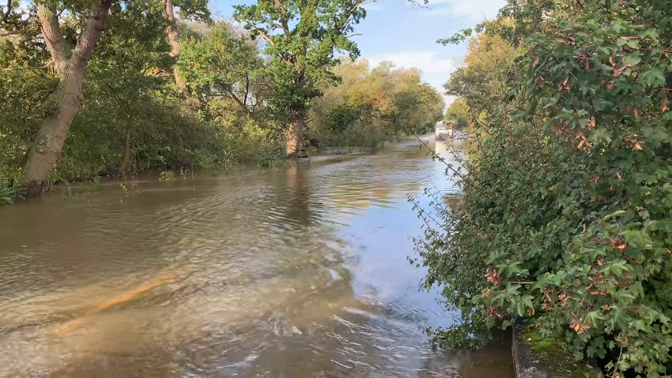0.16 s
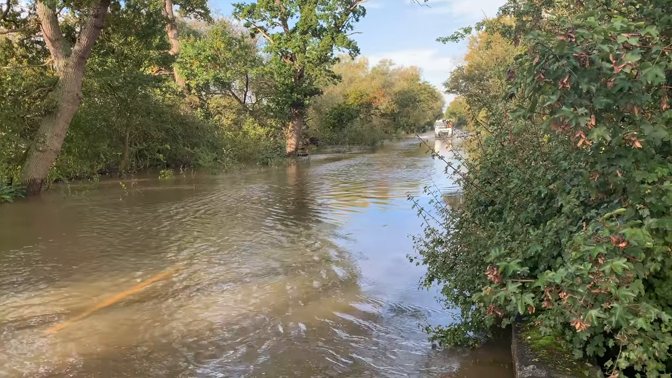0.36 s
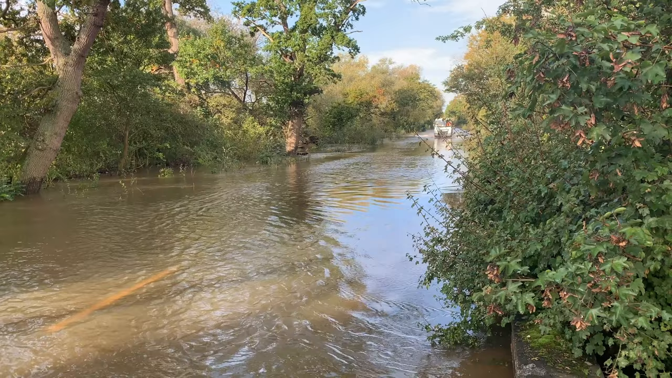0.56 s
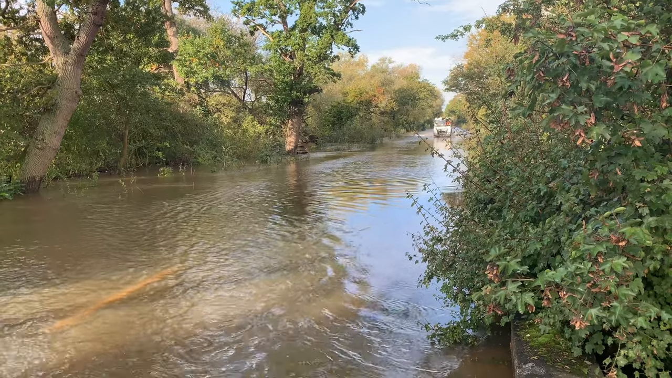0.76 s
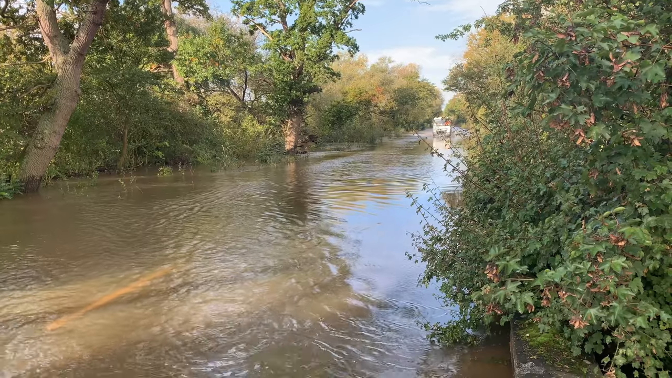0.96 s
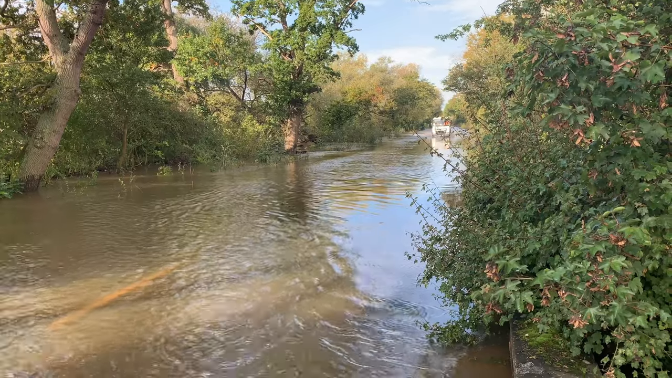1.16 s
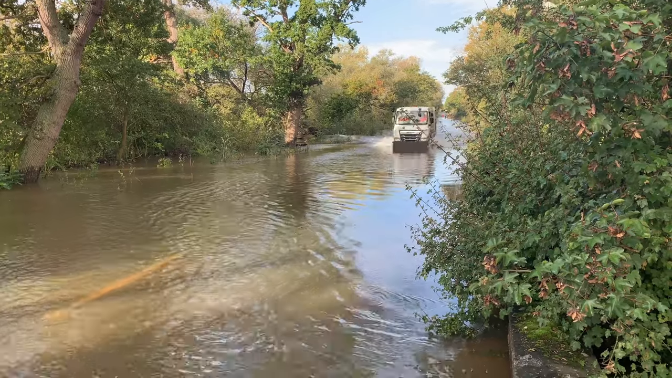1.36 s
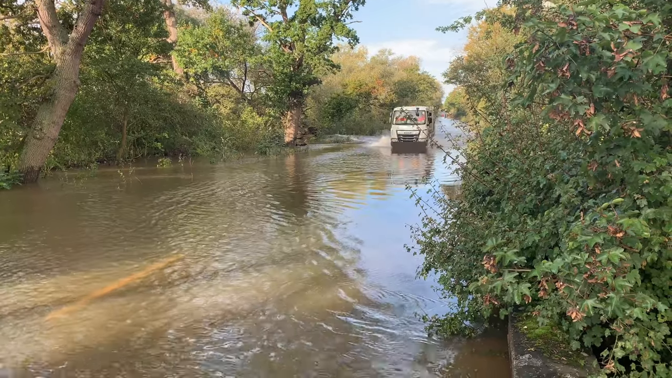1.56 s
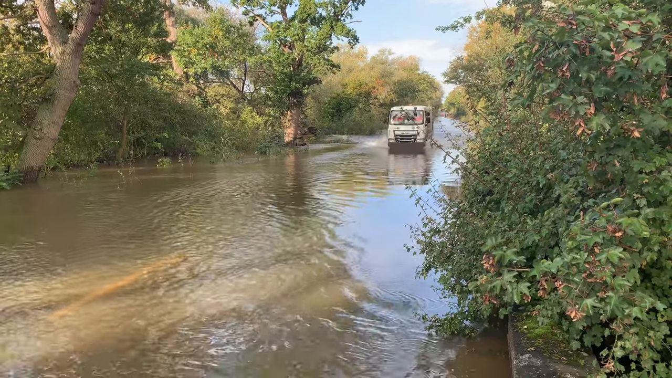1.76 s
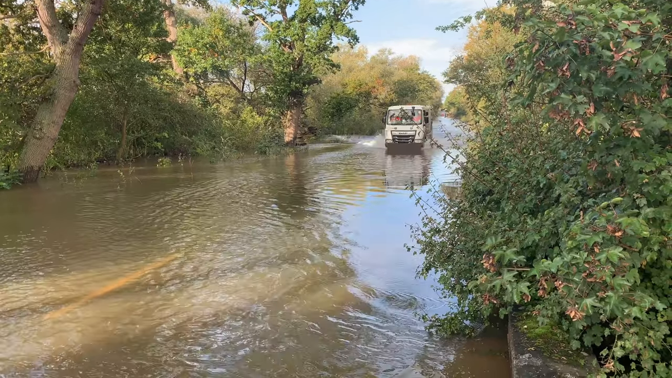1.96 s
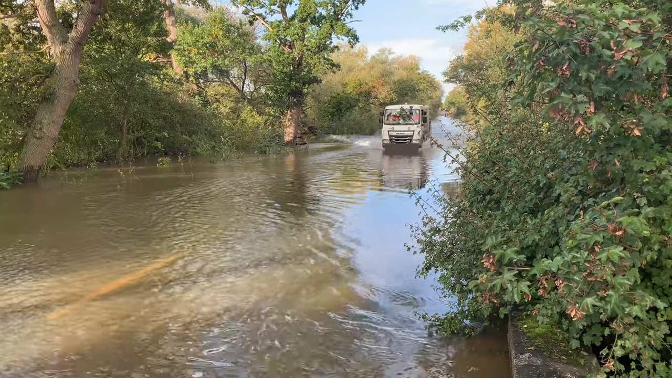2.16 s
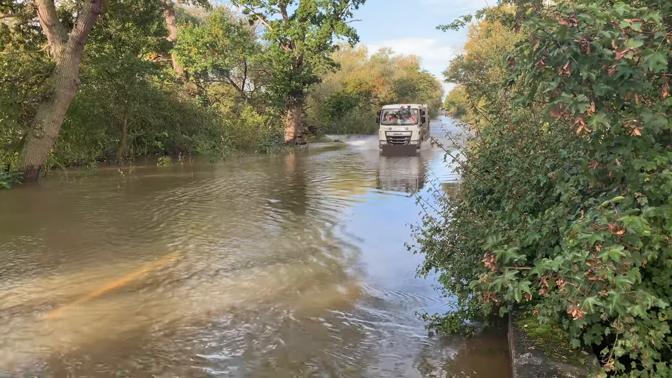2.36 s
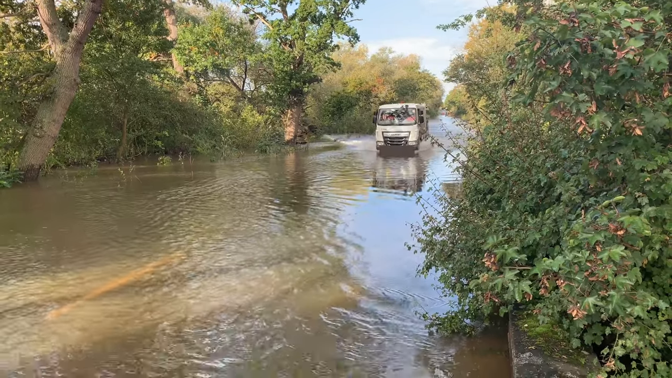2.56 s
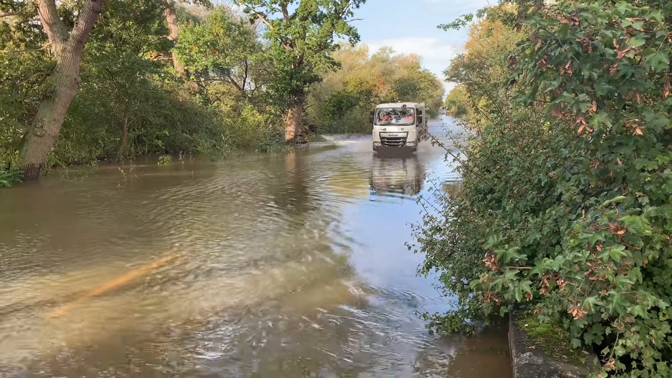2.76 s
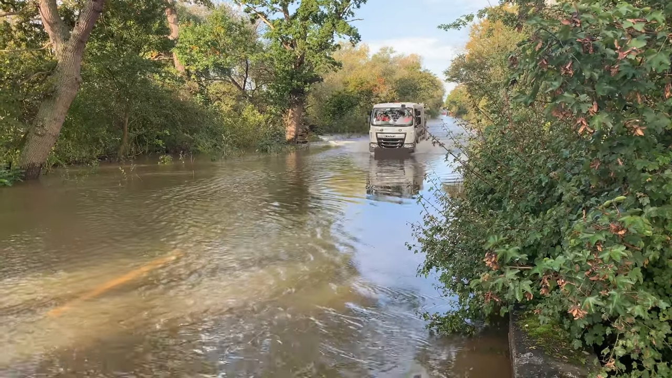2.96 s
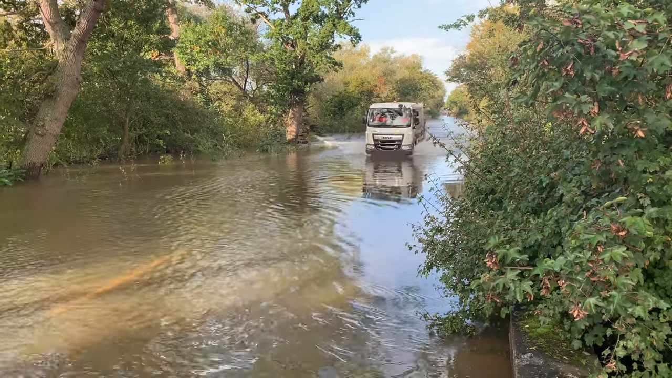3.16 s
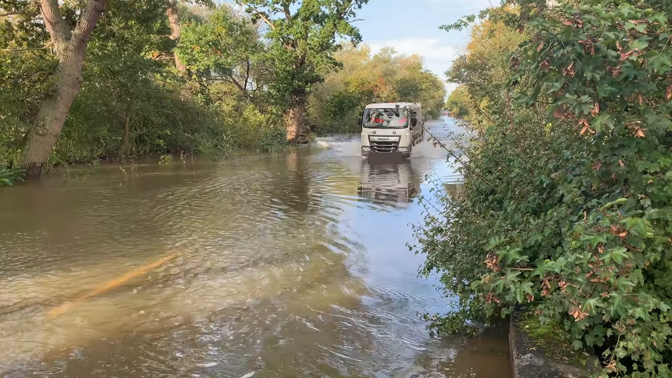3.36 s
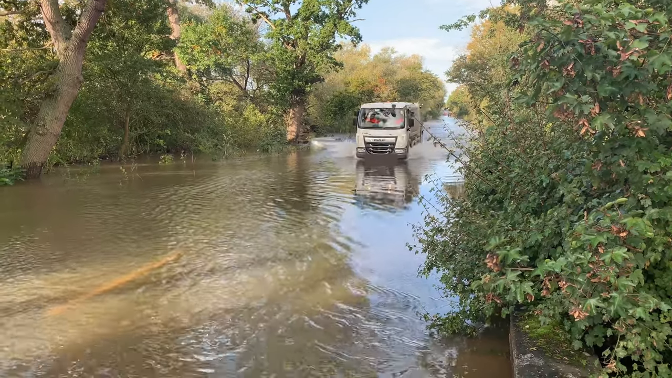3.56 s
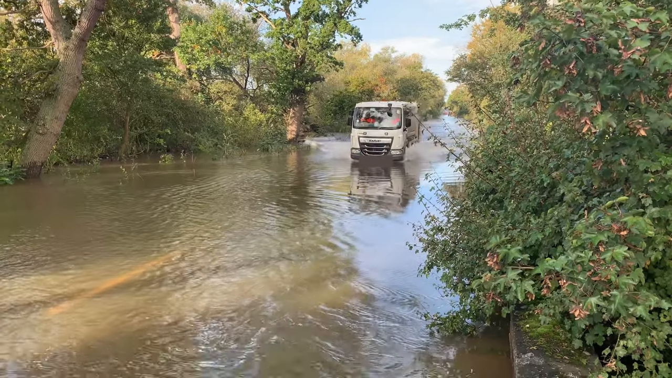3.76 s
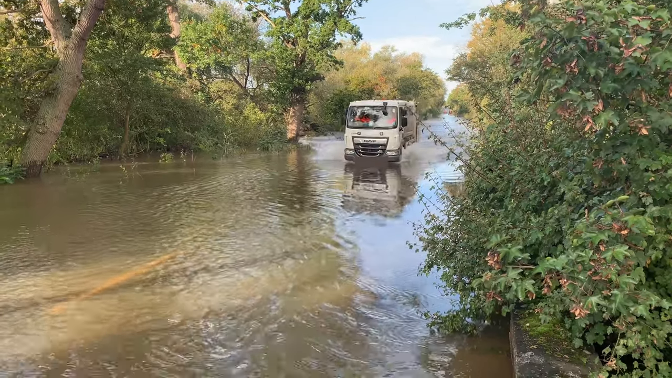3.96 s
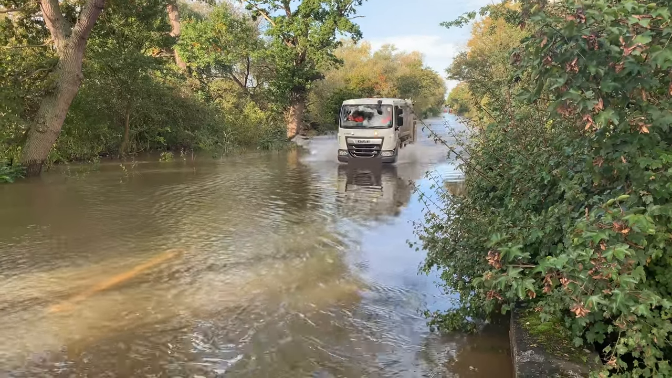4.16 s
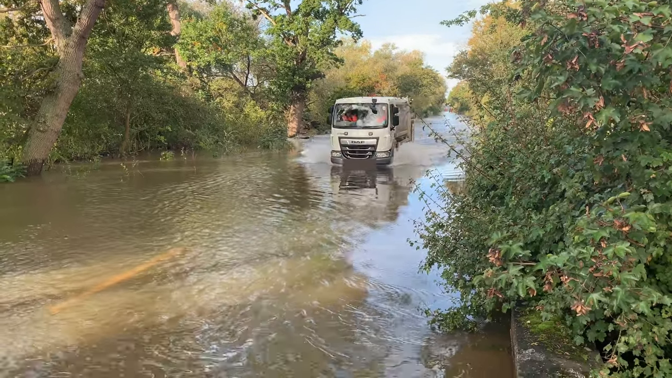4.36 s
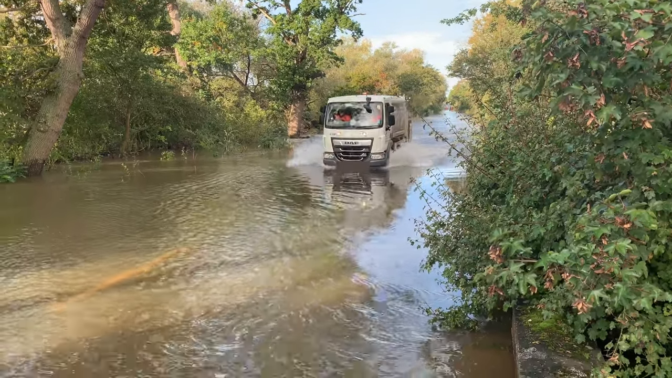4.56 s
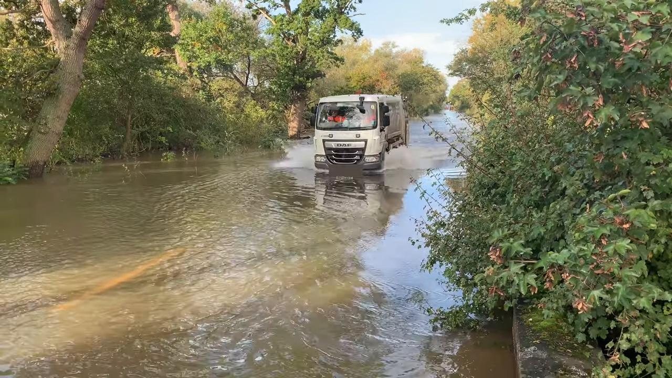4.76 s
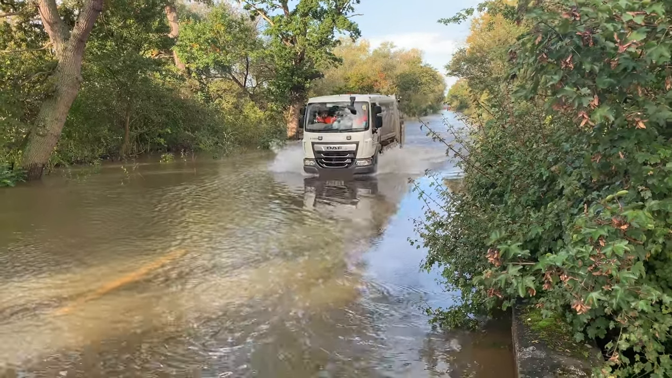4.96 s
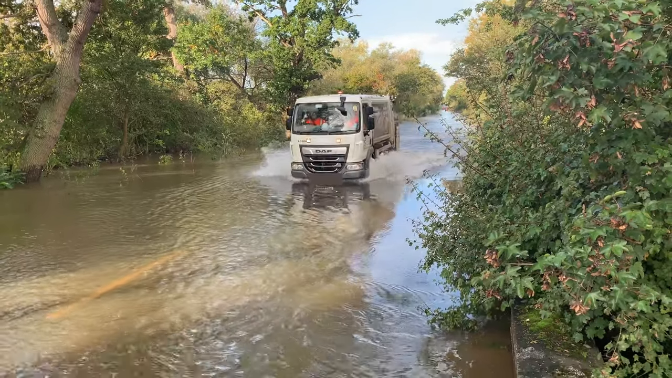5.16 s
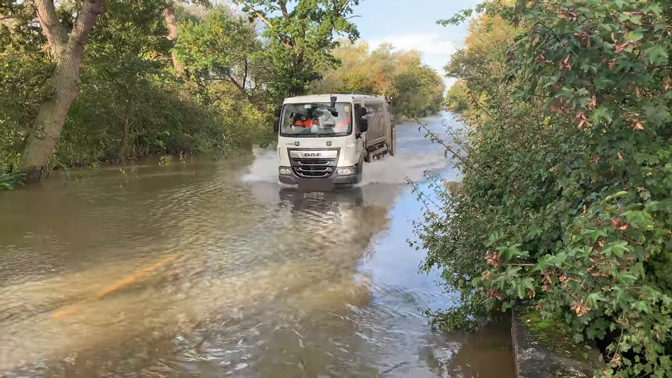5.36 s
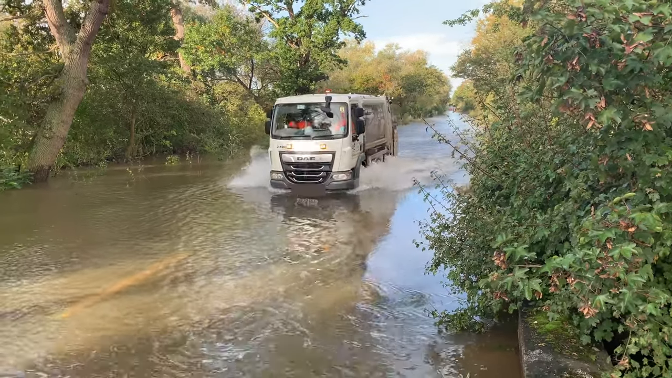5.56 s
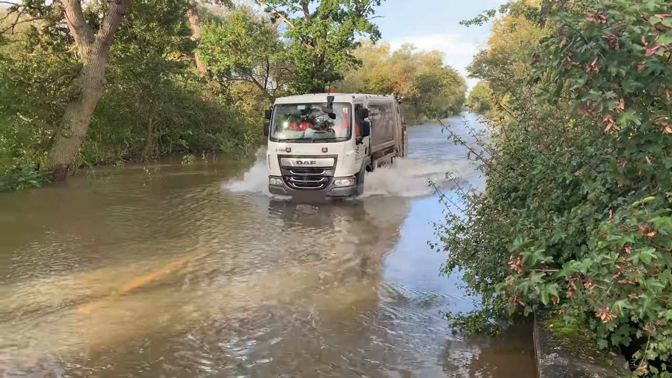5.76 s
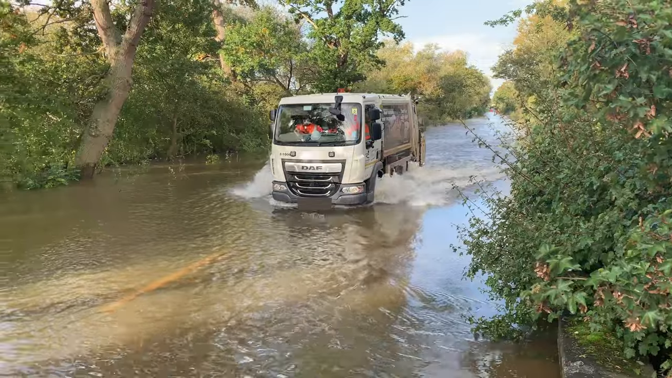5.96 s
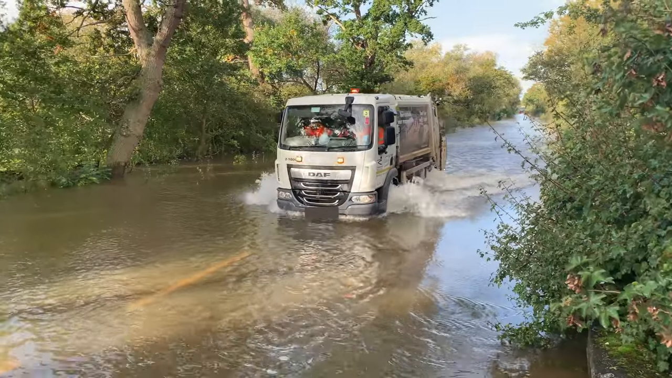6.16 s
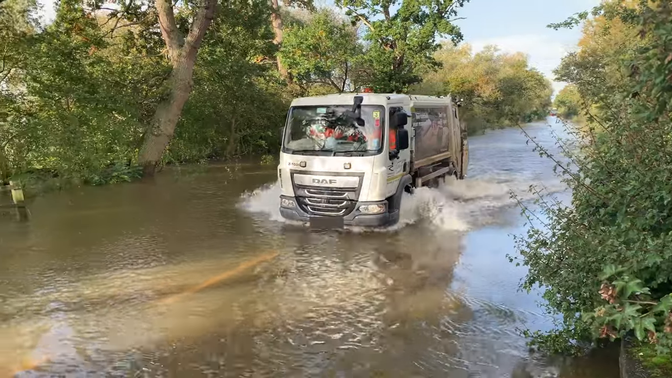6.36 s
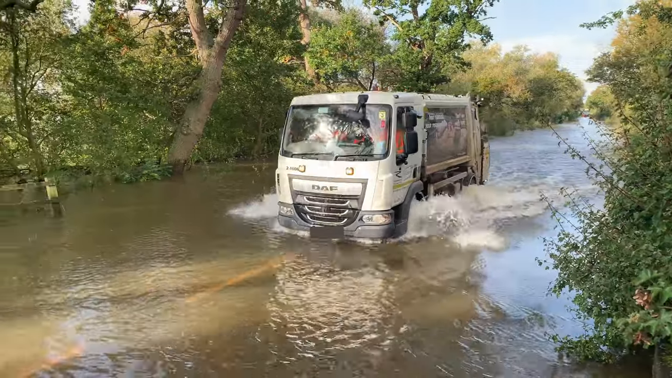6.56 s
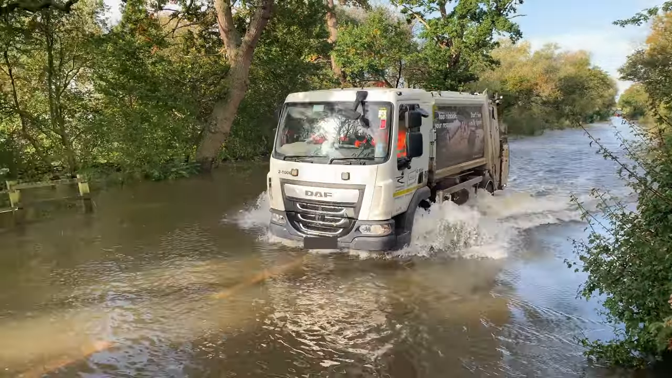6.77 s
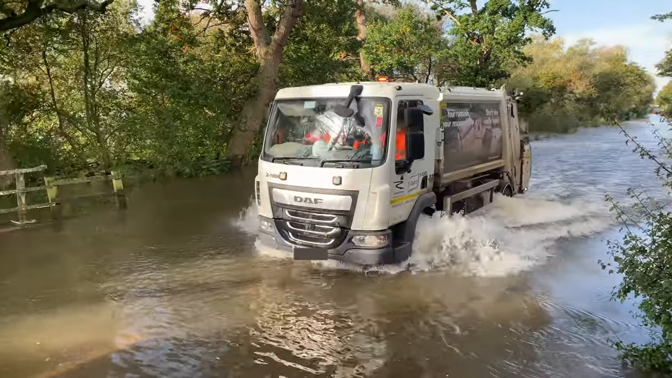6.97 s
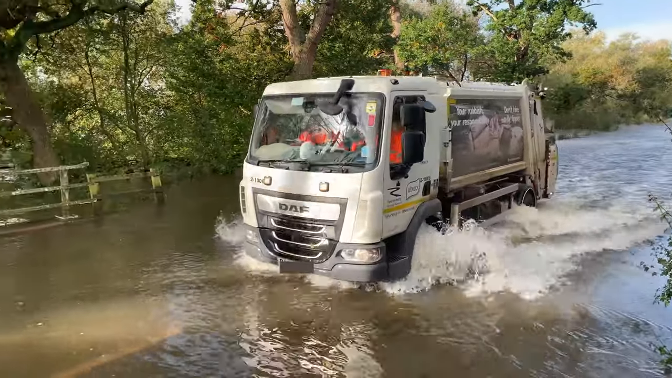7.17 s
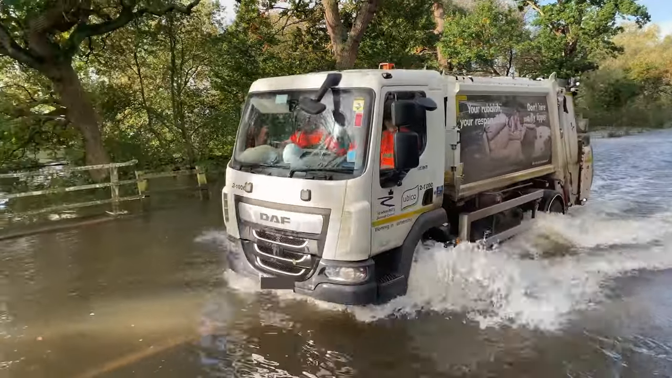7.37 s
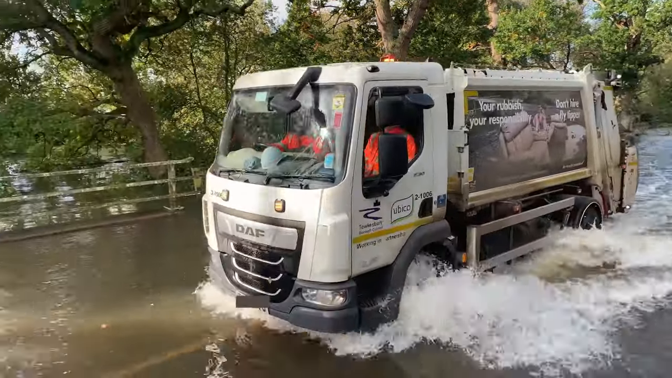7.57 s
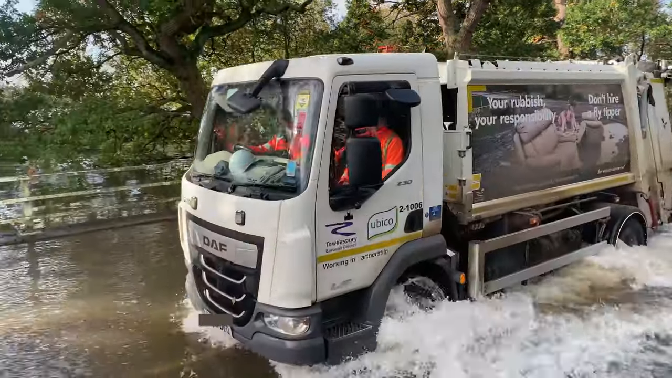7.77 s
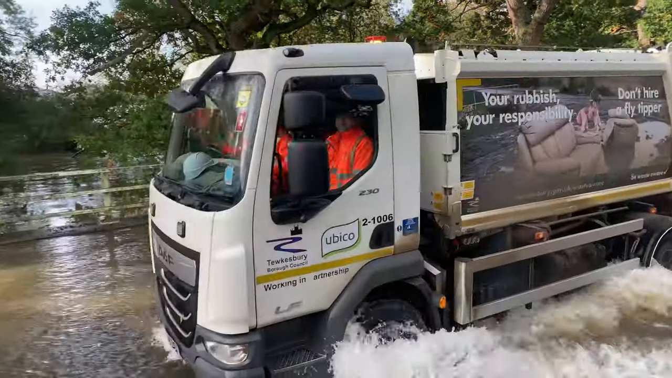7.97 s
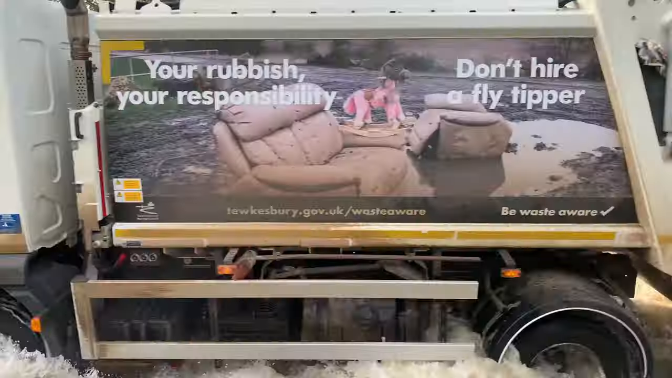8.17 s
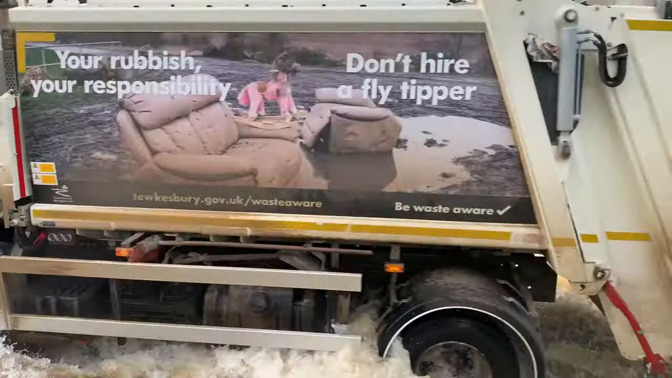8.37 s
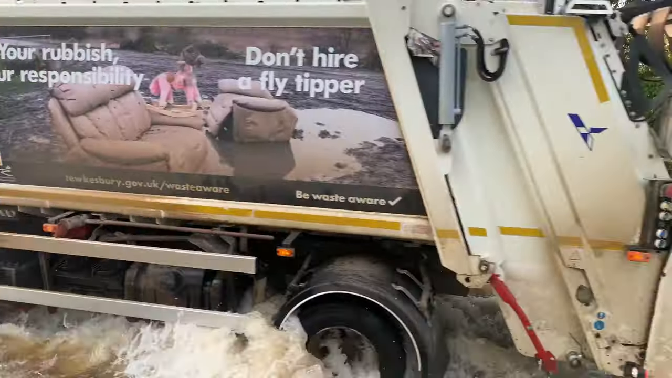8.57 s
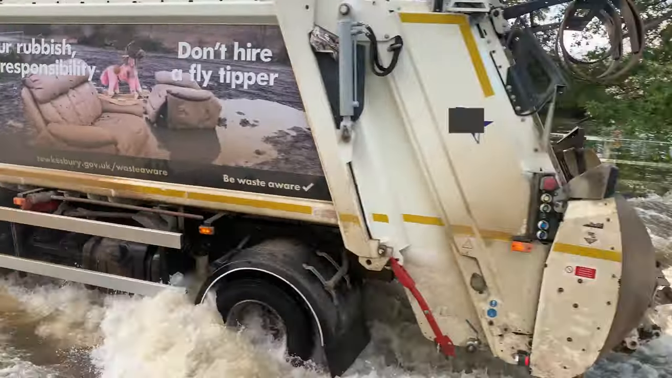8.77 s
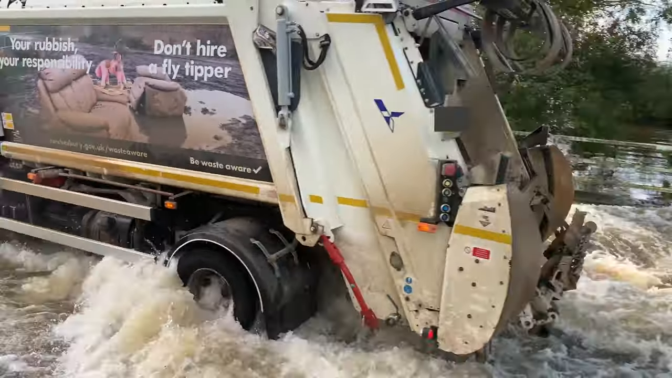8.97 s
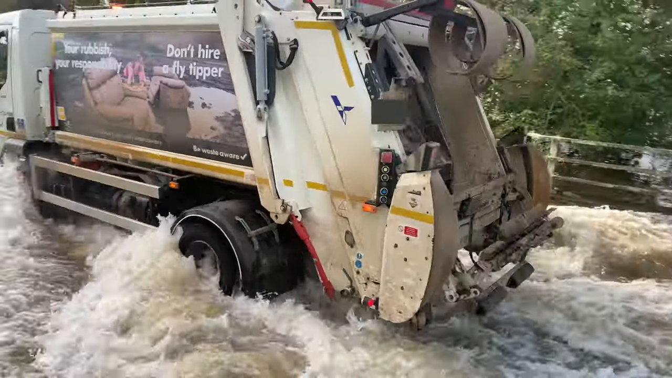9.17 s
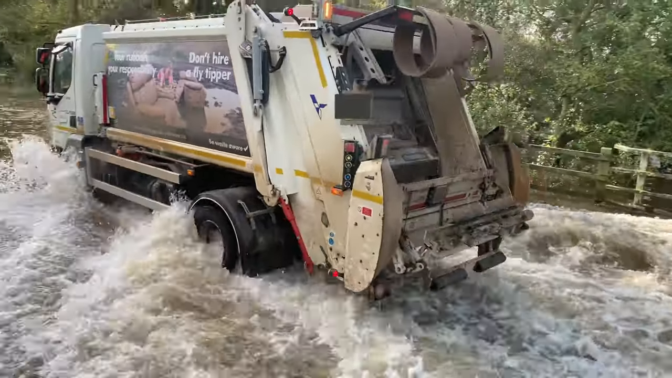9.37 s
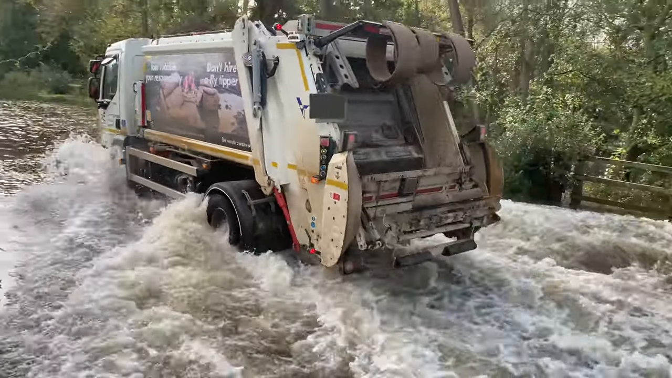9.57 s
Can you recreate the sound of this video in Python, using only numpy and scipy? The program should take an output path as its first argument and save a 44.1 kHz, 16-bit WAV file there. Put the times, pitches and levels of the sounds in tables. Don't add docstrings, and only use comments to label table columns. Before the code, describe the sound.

Open air beside a flooded tree-lined lane, heard in stereo from a few metres off the route. From 0 to 1.3 s a heavy diesel lorry is far away: faint low drone, soft rumble and water hiss, with small dull wind thumps at about 0.25, 0.35 and 0.9 s. Near 1.4 s the sound jumps to a closer moment. The steady engine drone, wavering with reflections, and a thin gear whine advance with growing spray; a weak wind puff comes around 2.1 s. From 4 to 6 s the water thickens and engine pitch sags slightly; the whine drops out around 6 to 7 s. Between 7.4 and 9 s the lorry passes close: bright splash bursts, roaring churn, deep hull booms, engine pitch rising slightly. The deep wake opens after 8.2 s, then the wash begins easing until the cut near 9.6 s.

```python
import sys
import numpy as np
from scipy import signal
from scipy.io import wavfile
from scipy.ndimage import uniform_filter1d

SR = 44100
rng = np.random.default_rng(int(sys.argv[2]) if len(sys.argv) > 2 else 0)


def convert_level_to_amplitude(level_db):
    exponent = np.asarray(level_db, float) / 20
    return 10 ** exponent


def generate_wav(sig):
    pcm = np.round(np.clip(np.atleast_2d(sig).T, -1, 1) * 32767).astype(np.int16)
    wavfile.write(sys.argv[1], SR, pcm)


N = 424683


def evened(x):
    return x / np.sqrt(np.mean(abs(x) ** 2) + 1e-20)


def read(points, hz, order=1):
    table = np.transpose(points)
    return np.interp(np.log(hz + 1), np.log(table[0] + 1), table[order])


def over_time(points, t):
    s, value = np.transpose(points)
    return np.interp(t, s, value)


def bumps(events, t):
    s, length, *columns = np.transpose(events)
    bells = np.exp(-(2 * (t - s[:, None]) / length[:, None]) ** 2)
    return np.array(columns) @ bells


def wander(t, slow_hz, fast_hz):
    rates_hz = np.geomspace(slow_hz, fast_hz, num=24)
    return evened(sum(np.sin(2 * np.pi * (f * t + rng.random())) / np.sqrt(f) for f in rates_hz))


def field(frames, bins, wide, long):
    hills = rng.standard_normal((bins, frames))
    hills = uniform_filter1d(hills, size=max(int(wide), 1), axis=0)
    return evened(uniform_filter1d(hills, size=max(int(long), 1), axis=1))


def metres(t, abreast_s, half_m):
    cut_s, skipped_s = 1.363, 9.9
    lorry_m_per_s, lane_m = 5, 4
    along_m = lorry_m_per_s * abs(t - skipped_s * (t < cut_s) - abreast_s)
    return np.hypot(lane_m, np.maximum(along_m - half_m, 0))


def heard_db(t, abreast_s, near_db, share, half_m):
    return near_db - share * 20 * np.log10(metres(t, abreast_s, half_m) / 5)


def side_on(t):
    return np.interp(t, (5, 7, 8.4), [0, 1 / 3, 1])


# middle_s, level_db, pitch_hz, length_s
THUMPS = [
    (0.242, -31, 49.7, 0.037),
    (0.356, -28, 50, 0.089),
    (0.934, -34, 60, 0.038),
    (2.102, -35, 51.3, 0.34),
    (8.151, -29, 33.6, 0.21),
]


def wind():
    t = np.arange(N) / SR
    out = 0
    for s, level_db, pitch_hz, length_s in THUMPS:
        swell = np.exp(-((t - s) / (.5 * length_s)) ** 2)
        out = out + convert_level_to_amplitude(level_db) * swell * np.cos(2 * np.pi * pitch_hz * (t - s))
    return np.array([out, -.12 * out])


# pitch_hz, width_hz, level_db
LANE_ECHOES = [(790, 43, 3), (1403, 400, -3), (1980, 63, -2), (2220, 270, 2.5), (2530, 180, 1.5),
               (3160, 180, -1.5), (4000, 140, 1), (4000, 150, -2), (4620, 240, 1.5), (5650, 1200, -1.5),
               (6480, 650, 3.5)]
# pitch_hz, level_db
PORT_SUM = [(6500, 3), (7250, 4.5), (8100, 5), (10300, 6), (11000, 0), (11600, -46), (12200, 9),
            (13000, 7.5), (15000, 9.5)]
# pitch_hz, level_db
PORT_DIFF = [(40, -21), (120, -9.5), (300, -8.5), (800, -1.5), (2100, 0), (2900, 7), (3900, 0.5), (7300, 6),
             (8200, 6), (8500, -18), (9500, -14), (9900, 3), (12500, 12.5), (13300, -8), (14600, -10),
             (15300, 3)]
# pitch_hz, share_in_step (-1 to 1), share_quarter_cycle_ahead (-1 to 1)
PORT_LINK = [(60, -0.77, -.2), (250, -0.77, -0.38), (450, -0.16, 0.68), (800, -0.055, .85),
             (1350, 0.55, .4), (1900, 0.11, -.55), (2600, -.3, .55), (4000, -.2, .2), (5300, -.5, .2),
             (6200, -.25, -.3), (7200, .1, .2), (8000, 0, .6), (10400, 0, -.55), (12400, 0, .3)]
# pitch_hz, level_db
NOTCH = [(6300, 0), (6900, -5), (7250, -14), (7650, -4), (8000, 0)]
# middle_s, length_s, added_depth (0-1)
SHADINGS = [
    (4.15, .7, .35),
    (9, .2, .65),
    (9.22, .22, .65),
]
# pitch_hz, level_db
MIC_TOP = [(14300, 0), (14900, -4), (15250, -13), (15600, -24), (16200, -45)]


def noise(spectrum, shift, control, patchy_db, ripple_db, flicker_db, size, count):
    hop = size // 4
    frames, hz = N // hop + 5, np.fft.rfftfreq(size, 1 / SR)[:count]
    t = np.arange(frames) * hop / SR
    far = 1 - side_on(t)

    patches = field(frames, count, wide=600 / hz[1], long=.05 * SR / hop)
    level_db = (read(spectrum, hz) + read(MIC_TOP, hz))[:, None] + patchy_db * patches
    level_db = level_db + flicker_db * wander(t, 3.4, 14) + np.outer(read(shift, hz), control(t))

    ripple_depth_db = ripple_db * (.3 + .7 * far)
    mid_ripple, side_ripple = [ripple_depth_db * field(frames, count, 170 / hz[1], 3 * SR / hop) for _ in "ms"]
    lane_db = sum(db * np.exp(-2 * ((hz - centre_hz) / width) ** 2) for centre_hz, width, db in LANE_ECHOES)
    notch_depth = .4 + bumps(SHADINGS, t)[0]
    mid_db = read(PORT_SUM, hz)[:, None] + np.outer(read(NOTCH, hz), notch_depth)
    mid_db = mid_db + mid_ripple + np.outer(lane_db, far)
    side_db = read(PORT_DIFF, hz)[:, None] + side_ripple

    link = np.outer(read(PORT_LINK, hz) + 1j * read(PORT_LINK, hz, order=2), .75 + .45 * far)
    link = link / np.maximum(abs(link) / .99, 1)
    a, b, c, d = rng.standard_normal((4, count, frames))
    mid = a + 1j * b
    side = link * mid + np.sqrt(1 - abs(link) ** 2) * (c + 1j * d)

    scale = np.sqrt(np.sum(convert_level_to_amplitude(2 * read(spectrum, hz))))
    z = np.array([mid * convert_level_to_amplitude(mid_db), side * convert_level_to_amplitude(side_db)]) * convert_level_to_amplitude(level_db) / scale
    z = np.pad(z, ((0, 0), (0, size // 2 + 1 - count), (0, 0)))
    return signal.istft(z, nperseg=size, noverlap=size - hop)[1][:, :N]


# middle_s, length_s, spray_db, rumble_db, hull_boom_db
SURGES = [(2.5, .4, .5, 0, 1.5), (4, 0.83, .3, 1, -1.5), (4.9, 1.5, 0.7, 0, -1.7),
          (6.3, 0.79, -0.4, 1.5, -1.2), (6.65, .3, -0.9, .1, 0.5), (7.4, 0.61, -0.7, -0.2, 3),
          (7.42, 0.058, 2, 0, -1), (7.78, 0.12, 2, 2.5, -1.5), (8.08, 0.11, 1, 0.5, -3.5),
          (8.22, 0.16, 0.5, 0.3, 6.5), (8.55, 0.28, 0.3, -1.2, 7.5), (8.95, 0.23, 0, -0.7, .1),
          (9.1, 0.18, 0.2, 0.5, 2.5), (9.55, 0.35, -0.7, -1.5, -2)]


def surges(t):
    return bumps(SURGES, t)


# pitch_hz, level_db (per Hz)
SPRAY = [(700, -4), (1400, -1), (2200, 1.5), (2700, -1.5), (3200, -3), (5000, -3.5), (6500, -6), (8000, -5),
         (8900, -2.5), (10300, -7), (12000, -13), (14300, -13)]
# pitch_hz, level_db
AIR_LOSS = [(6500, 0), (8500, .5), (10500, 1.1), (12000, 2.2), (15000, 2.5)]


def bow_spray():
    t = np.arange(N) / SR
    mist = lambda s: -2.1 * (metres(s, abreast_s=8, half_m=0) / 33) ** 1.7
    spray = noise(SPRAY, AIR_LOSS, mist, patchy_db=1.15, ripple_db=1.1, flicker_db=.45, size=512, count=190)
    level_db = heard_db(t, abreast_s=8, near_db=-29, share=.98, half_m=.5) + surges(t)[0] + .55
    return convert_level_to_amplitude(level_db) * spray


# pitch_hz, level_db (per Hz)
CHURN = [(150, -38), (300, -1), (400, 1), (750, 0.5), (1000, -3.5), (1400, -8.5), (3000, -27)]
# pitch_hz, level_db
WAKE_BODY = [(200, 3), (300, 6.7), (400, 4.1), (500, 0.33), (750, 0.033), (1300, .1), (2200, 6.3),
             (3000, .1)]
# middle_s, length_s, level_db
DEPTHS = [
    (5.1, 2.4, 1.5),
    (6.55, .5, -0.4),
    (7.5, 0.62, 1),
    (8.55, 0.31, 0.9),
]


def wake_churn():
    t = np.arange(N) / SR
    stern = lambda s: np.interp(s, (8.1, 8.25), [0, 1])
    churn = noise(CHURN, WAKE_BODY, stern, patchy_db=.03, ripple_db=1.5, flicker_db=.6, size=1024, count=100)
    level_db = heard_db(t, abreast_s=8.5, near_db=-29.5, share=.82, half_m=1) + bumps(DEPTHS, t)[0]
    return convert_level_to_amplitude(level_db) * churn


# pitch_hz, level_db (per Hz)
RUMBLE = [(25, -34), (40, -23), (60, 2), (100, 0), (170, -2.5), (270, -7), (340, -21.5), (600, -48)]
# pitch_hz, level_db
HULL_BOOM = [(150, 0), (250, .7), (340, 1.5), (430, 1.7), (600, .5)]


def hull_rumble():
    t = np.arange(N) / SR
    boom = lambda s: 1.1 + surges(s)[2]
    rumble = noise(RUMBLE, HULL_BOOM, boom, patchy_db=.44, ripple_db=-.65, flicker_db=-.05, size=4096, count=80)
    level_db = heard_db(t, abreast_s=8.5, near_db=-23, share=.6466, half_m=1.5) + surges(t)[1] + 1.08
    return convert_level_to_amplitude(level_db) * rumble


# time_s, turns_hz
SPEED = [(0, 21.8), (.7, 22.1), (4.3, 22.04), (4.5, 21.6), (4.9, 21.47), (6.15, 21.27), (6.6, 21.4),
         (7.2, 21.73), (7.8, 21.83), (8.4, 22.3), (9.63, 22.6)]
ORDERS_K = [2, 3, 4, 5, 6, 9, 12, 15, 18, 21]
# front_db, side_db
ORDERS_DB = [(-20, -26), (0, 0), (-3, -11), (-16, -18), (-6, -11), (-14, -22), (-7, -22), (-14, -32),
             (-27, -36), (-22, -36)]
# middle_s, length_s, level_db
BEATS = [
    (2.1, .5, 1.5),
    (2.8, .4, -2.5),
    (3.7, .3, 1.5),
    (4.15, .4, -2),
    (7.15, .7, -4),
    (7.95, .6, 3),
    (8.5, .3, -1),
    (8.95, .4, 1.5),
    (9.45, .2, 2),
]


def engine():
    t, coarse = np.arange(N) / SR, np.arange(0, N / SR + .01, .002)
    turns = np.cumsum(over_time(SPEED, t)) / SR
    sag = np.minimum(over_time(SPEED, coarse) - 22, 0)

    firing_db = heard_db(coarse, abreast_s=8.5, near_db=-20, share=1, half_m=0) + 7 * sag
    firing_db = firing_db + bumps(BEATS, coarse)[0] + 3
    side = side_on(coarse)
    out = 0
    for k, (front_db, side_db) in zip(ORDERS_K, ORDERS_DB):
        sway_db = 1.8 * wander(coarse, .6, 6)
        level_db = firing_db + front_db + side * (side_db - front_db) + sway_db
        out = out + np.interp(t, coarse, convert_level_to_amplitude(level_db)) * np.sin(2 * np.pi * (k * turns + rng.random()))

    gear_teeth = 34.52
    coasting = uniform_filter1d(1. * (coarse > 6.05) * (coarse < 6.95), size=80)
    shade_db = np.interp(coarse, (7.55, 8.15), [0, -15])
    whine_db = heard_db(coarse, abreast_s=7.5, near_db=-44, share=.55, half_m=0) + 5.5
    whine_db = whine_db - 14 * coasting + shade_db + 1.5 * wander(coarse, 2, 20)
    slip = (.015 - .15 * sag) * wander(coarse, 2, 20)
    mesh = gear_teeth * turns + np.interp(t, coarse, slip)
    out = out + np.interp(t, coarse, convert_level_to_amplitude(whine_db)) * np.sin(2 * np.pi * mesh)
    return np.array([out, -.11 * out])


def scene():
    mid, side = wind() + bow_spray() + wake_churn() + hull_rumble() + engine()
    return np.array([mid + side, mid - side])


def roll_off(x):
    return signal.sosfilt(signal.butter(12, 15830, fs=SR, output="sos"), x)


def record(dry):
    mix = 1.396 * np.tanh(dry / 1.404)
    return roll_off(mix)


dry = scene()
out = record(dry)
generate_wav(out)
```